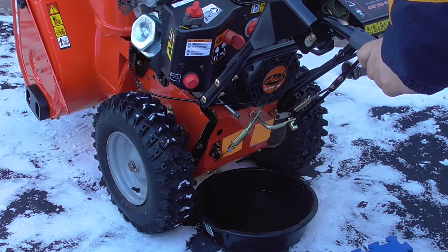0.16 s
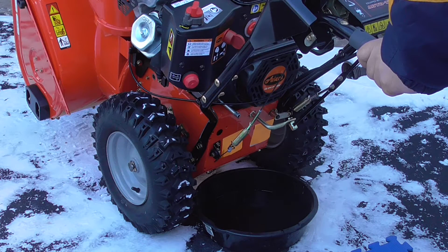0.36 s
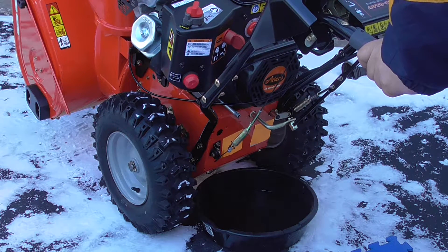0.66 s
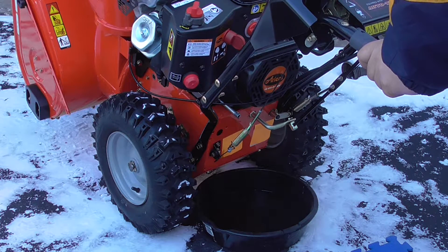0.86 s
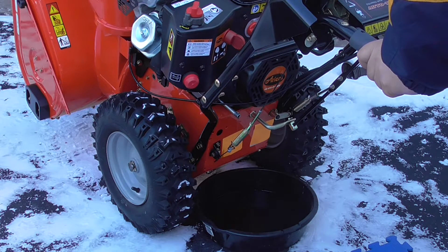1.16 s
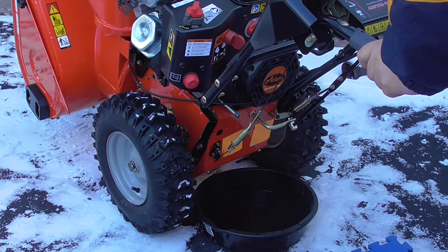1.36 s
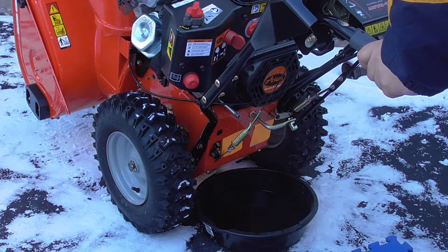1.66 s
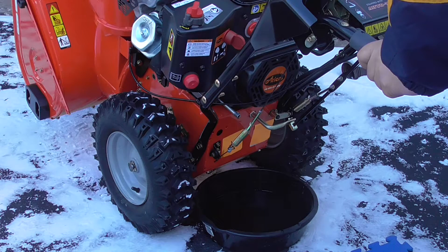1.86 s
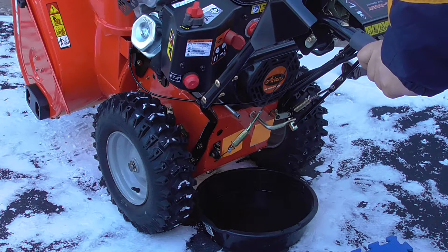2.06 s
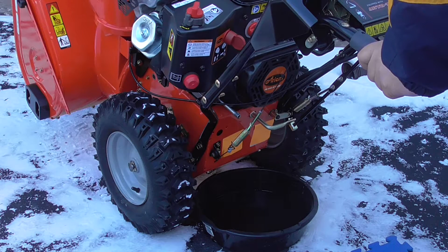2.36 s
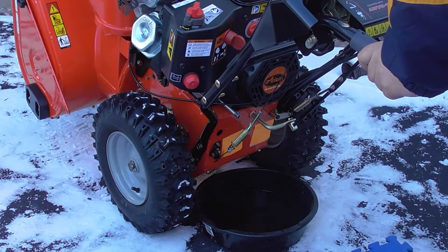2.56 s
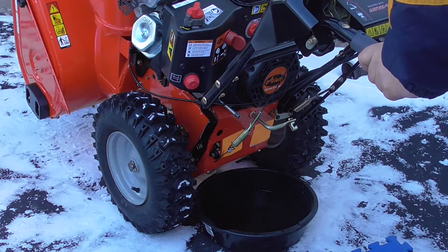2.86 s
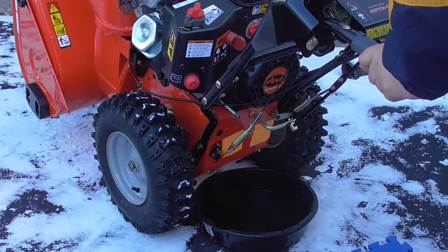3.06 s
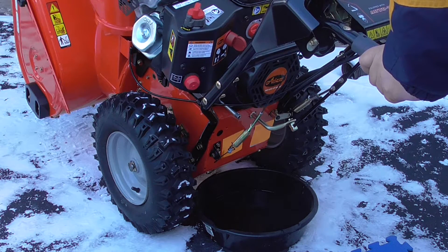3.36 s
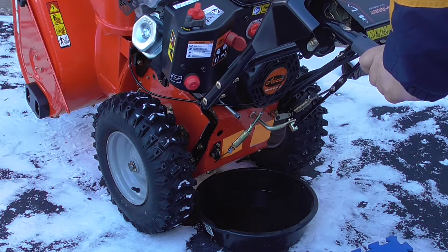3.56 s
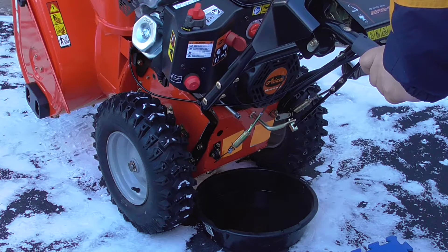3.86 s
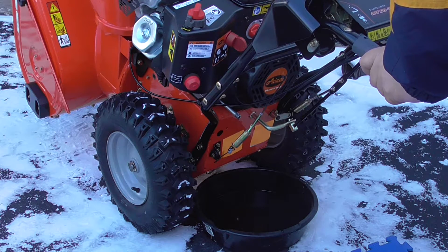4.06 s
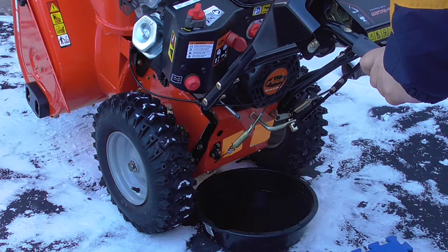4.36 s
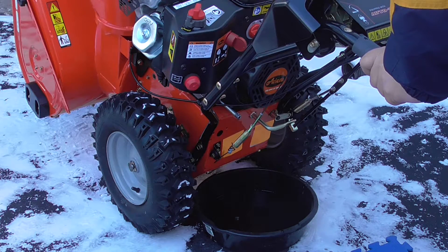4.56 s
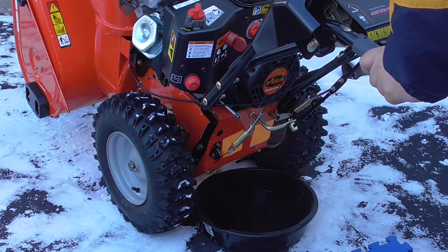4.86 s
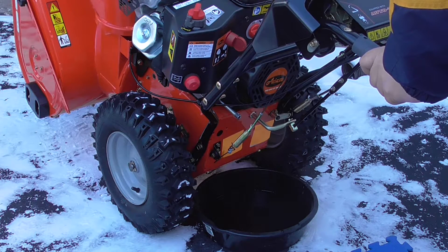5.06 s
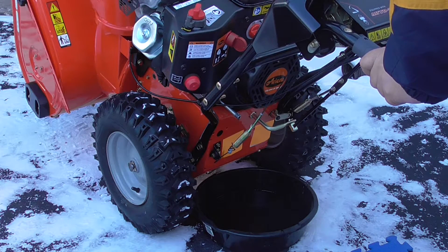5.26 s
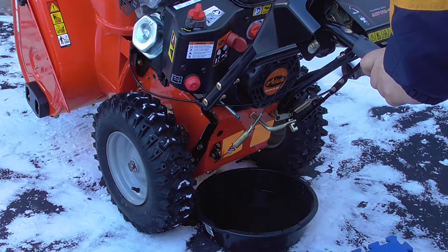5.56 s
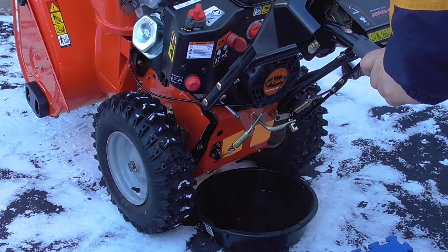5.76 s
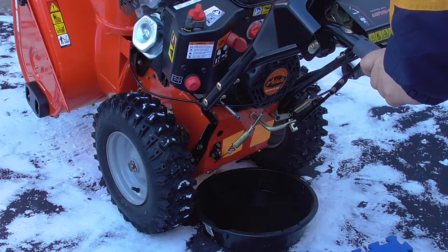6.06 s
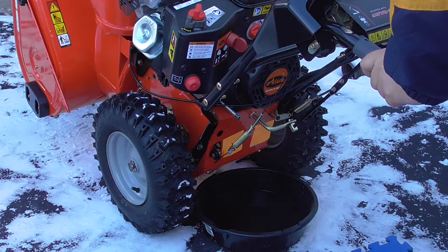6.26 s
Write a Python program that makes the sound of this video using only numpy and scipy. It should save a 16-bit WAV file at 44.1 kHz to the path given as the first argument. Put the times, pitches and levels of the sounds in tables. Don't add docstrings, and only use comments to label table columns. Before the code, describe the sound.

Eight dull, hollow knocks ring out one by one across a quiet snowy yard, each with short echoes, over faint traffic hum and wind buffeting.

```python
import sys
import numpy as np
from scipy import signal
from scipy.fft import rfft, irfft, next_fast_len
from scipy.io import wavfile
from scipy.ndimage import uniform_filter1d

SR = 44100
rng = np.random.default_rng(int(sys.argv[2]) if len(sys.argv) > 2 else 0)


def dump_mix(stems):
    frames = np.atleast_2d(stems).T
    limited = np.clip(frames, -1, 1)
    pcm = np.round(limited * 32767).astype(np.int16)
    wavfile.write(sys.argv[1], SR, pcm)


def linear_from_db(decibels):
    return 10 ** (np.asarray(decibels, float) / 20)


N = 282901
LONG = next_fast_len(N)
COARSE = 10

# pitch_hz, level_db (per Hz)
TRAFFIC_SPECTRUM = [(18, -47), (30, -31), (54, -6.5), (135, -6), (165, -1.5), (230, -2.5), (331, -8),
                    (377, -6.5), (496, -11), (876, -14.5), (1690, -28.5), (2300, -55), (2600, -120)]
# time_s, level_db, extra_bass_db
TRAFFIC_SWELL = [(0.0, -57, 4), (1.1, -58, 1), (2.4, -58, -2), (3.1, -58, 1), (4.6, -60, -2),
                 (5.6, -59.5, 2.5), (6.41, -59.5, 1)]
# pitch_hz, likeness (0-1)
PORT_LIKENESS = [(50, 0.88), (130, 0.94), (250, 0.91), (640, 0.54), (1400, 0.15), (3000, 0.049)]

# start_s, level_db, hold_s, left_share (0-1), eddy_hz
GUSTS = [(0, -42, .015, .15, 75), (0.034, -34.5, 0.027, 0.4, 178), (0.076, -30, 0.024, 0.07, 110),
         (0.133, -36, 0.027, 0.3, 150), (.186, -22.5, 0.044, 0.38, 155), (0.247, -34.5, 0.034, .05, 110),
         (.298, -31, 0.027, 0.07, 160), (0.395, -35.5, .015, 0.85, 101), (0.463, -46, 0.02, 0.4, 90),
         (1.08, -51, .07, .5, 100), (1.162, -32, 0.028, .27, 131), (1.23, -48, .12, 0.5, 92),
         (1.98, -47.5, 0.018, .98, 71), (3.18, -51, 0.074, .98, 99), (3.373, -44.5, .055, .9, 109),
         (3.495, -47, 0.027, 0.8, 93), (4.429, -47, .12, 0.34, 88), (4.637, -41.5, .022, .02, 87),
         (4.826, -35.5, 0.024, 0.17, 141), (5.337, -44, .025, 0.9, 84.6), (5.62, -46, .13, .35, 79.6),
         (6.055, -46.5, .08, .87, 136), (6.238, -44, .11, 0.9, 104), (6.394, -28, .03, .02, 112)]
GUST_RISE_DB_PER_S, GUST_FALL_DB_PER_S = 898, 600
CALM_DB, CALM_EDDY_HZ = -64.5, 75

# pitch_hz, level_db (per Hz)
HISS_SPECTRUM = [(1060, -43), (1800, -11.5), (2040, 3), (2280, -3), (2680, -5), (3480, -3.5), (3840, -3),
                 (4090, -2), (5920, -6), (7970, -4), (8720, -3.5), (12700, -4.5), (15500, -8)]
HISS_DB, HISS_SAG_DB_PER_S = -69, 0.22
# pitch_hz, width_hz, level_db
CIRCUIT_HUMP = (13060, 200, -83)
# pitch_hz, width_hz, level_db
FRAME_BUZZ = [(7640, 90, -98), (7950, 90, -91), (9150, 90, -99), (10760, 150, -94), (11780, 90, -99),
              (12460, 170, -91), (12760, 170, -89), (13050, 200, -92), (13550, 280, -95)]
FRAME_HZ = 59.942

# start_s, peak_db, pitch_hz
DROPS = [
    (.6235, -63, 3150),
]

# start_s, peak_db, crack_db (brightness above the usual for a blow)
KNOCKS = [
    (0.8513, -22, 0.5),
    (2.5034, -19.5, 0.5),
    (2.9296, -23.5, -4),
    (3.2243, -22.5, -2.5),
    (3.5665, -26.5, -24),
    (4.0502, -21.5, -1),
    (4.328, -30.5, -18),
    (5.4364, -23, -1.5),
]
# pitch_hz, strength (signed), t60_s
BODY_MODES = [(238, .24, .04), (612, -1.095, .009), (953, .198, .04), (1050, -.07, .035), (1437, .04, .035)]
CONTACT_HZ = 2080
# pitch_hz, level_db, t60_s
SLAP_MODES = [(1700, 9.5, 0.0059), (2014, -2, 0.03), (2290, 5, 0.022), (2534, 6.5, 0.011), (2800, -9, .025)]
# pitch_hz, level_db, t60_s
RIM_MODES = [(1265, -23.5, 0.039), (1350, -26.5, 0.013), (1473, -28.5, 0.12)]
# pitch_hz, level_db, t60_s
BOOM_MODES = [(157, 0.5, 0.28), (171, -4, 0.23), (224, 0.5, 0.18), (290.5, -6, 0.29), (408.8, -8, 0.83)]
# delay_ms, gain (signed), left_minus_right_gain (signed)
ECHO_PATHS = [(0.0, 0.69, 0.05), (1.13, 0.23, 0.02), (3.13, -0.34, 0.01), (5.56, 0.29, -0.02),
              (7.07, 1.11, 0.04), (11.2, -0.5, 0.0), (12.79, -0.34, 0.06), (15.8, 0.18, -0.03),
              (17.41, 0.19, 0.02), (18.71, -0.19, 0.02), (22.29, -0.18, -0.06), (23.7, -0.25, -0.07),
              (36.1, -0.24, -0.01), (37.64, -0.19, 0.02), (42.13, -0.26, -0.05), (44.51, 0.23, 0.0),
              (53.61, 0.21, 0.01), (59.95, -0.19, -0.03), (51.97, 0.14, -0.01), (56.21, 0.14, 0.01),
              (65.06, -0.13, -0.02), (86.35, -0.11, -0.02), (101.34, -0.11, 0.01), (83.4, -0.11, -0.01),
              (89.05, -0.1, 0.0), (91.68, -0.09, -0.03), (107.62, 0.06, 0.01), (146.24, 0.07, 0.0)]
# arrival_ms, level_db, dying_db_per_ms
FAR_WALLS = [(20, -25, .3), (46.3, -30, .3), (62, -33, 1.2), (84.3, -28.5, .3), (114, -30, .45),
             (145.6, -29, .9), (168, -41, .11)]
WALL_RISE_DB_PER_MS = 2.5


def rms_one(x):
    return x / np.sqrt(np.mean(x ** 2) + 1e-20)


def in_time(rows):
    s, *columns = np.transpose(rows)
    return [np.interp(np.arange(N) / SR, s, column) for column in columns]


def at_hz(points, hz):
    table_hz, value = np.array(points).T
    return np.interp(np.log(hz), np.log(table_hz), value)


def butter(x, hz, kind, order=2, step=1):
    return signal.sosfilt(signal.butter(order, hz, kind, fs=SR / step, output="sos"), x)


def resonance(x, hz, width):
    r = np.exp(-np.pi * width / SR)
    poles = [1, -2 * r * np.cos(2 * np.pi * hz / SR), r * r]
    return signal.lfilter([(1 - r * r) / 2, 0, (r * r - 1) / 2], poles, x)


def coloured(spectrum, channels):
    hz = np.maximum(np.fft.rfftfreq(LONG, 1 / SR), 1)
    white = rfft(rng.standard_normal((channels, N)), LONG)
    return white * linear_from_db(at_hz(spectrum, hz)), hz


def coarse_noise(hz, kind):
    white = rng.standard_normal(N // COARSE + 2001)
    return rms_one(butter(white, hz, kind, step=COARSE)[2000:])


def modes(table, t):
    return sum(linear_from_db(db - 60 * t / t60) * np.sin(2 * np.pi * hz * t) for hz, db, t60 in table)


def traffic():
    (mid, side), hz = coloured(TRAFFIC_SPECTRUM, channels=2)
    alike = np.clip(at_hz(PORT_LIKENESS, hz), 0, 1)
    pair = np.sqrt(1 + alike) * mid + np.sqrt(1 - alike) * side * [[1], [-1]]
    deep = 1 / (1 + (hz / 170) ** 4)
    level_db, bass_db = in_time(TRAFFIC_SWELL)
    upper_hum = irfft(pair * (1 - deep), LONG)[:, :N]
    deep_hum = irfft(pair * deep, LONG)[:, :N]
    return rms_one(upper_hum + linear_from_db(bass_db) * deep_hum) * linear_from_db(level_db + 8.5)


def gusts():
    t = np.arange(0, N, COARSE) / SR
    s, db, hold, left, hz = np.transpose(GUSTS)[:, :, None]
    rise_db = GUST_RISE_DB_PER_S * np.maximum(s - t, 0)
    fall_db = GUST_FALL_DB_PER_S * np.maximum(t - s - hold, 0)
    power = linear_from_db(db - rise_db - fall_db) ** 2
    calm = linear_from_db(CALM_DB) ** 2
    total = power.sum(axis=0) + calm
    left_share = ((power * left).sum(axis=0) + 0.5 * calm) / total
    eddy_hz = ((power * hz).sum(axis=0) + CALM_EDDY_HZ * calm) / total
    return 10 * np.log10(total), left_share, eddy_hz


def wind(lump_db, fall_db, skirt_db, top, widen):
    level_db, left, eddy_hz = gusts()
    ports = []
    for share in (left, 1 - left):
        flutter, power = 0, 0
        for hz in 42 * 2 ** np.arange(0, 4.5, 1 / 3):
            octaves = np.log2(hz / eddy_hz)
            weight = linear_from_db(np.maximum(-fall_db * octaves ** 2, skirt_db - 8.4 * np.abs(octaves)))
            eddies = coarse_noise([hz / 1.111, hz * 1.125], "band")
            eddies = eddies * linear_from_db(lump_db * coarse_noise(13.6, "low"))
            flutter, power = flutter + weight * eddies, power + weight ** 2
        flutter = flutter / np.sqrt(power)
        flutter = flutter / (uniform_filter1d(flutter ** 2, size=130) + 0.045) ** 0.29
        port = flutter * np.sqrt(np.clip(share, 0, 1)) * linear_from_db(level_db + 4.1)
        port = signal.resample_poly(port, COARSE, 1)[:N]
        ports.append(top * np.tanh(port / top))
    pair = np.array([ports[0] - widen * ports[1], ports[1] - widen * ports[0]])
    falloff = np.clip((N - np.arange(N)) / 400, 0, 1)
    return falloff * butter(pair, 42, "high")


def camera():
    mid, side = irfft(coloured(HISS_SPECTRUM, channels=2)[0], LONG)[:, :N]
    hiss_db = HISS_DB - HISS_SAG_DB_PER_S * np.arange(N) / SR + 3.0
    hiss = rms_one(np.array([mid + 0.86 * side, mid - 0.9 * side])) * linear_from_db(hiss_db)
    hz, width, db = CIRCUIT_HUMP
    hump = rms_one(resonance(rng.standard_normal((2, N)), hz, width))
    hump = hump * linear_from_db(db) * linear_from_db(np.array([[-3.0], [3.0]]))
    pulses = np.diff(np.floor(np.arange(N + 1) * FRAME_HZ / SR))
    buzz = 0
    for hz, width, db in FRAME_BUZZ:
        ringing = resonance(resonance(pulses, hz, width), hz, width)
        buzz = buzz + linear_from_db(db) * rms_one(ringing)
    return hiss + hump + buzz


def drops():
    out, t = np.zeros(N), np.arange(800) / SR
    for s, db, hz in DROPS:
        noise = rng.standard_normal(len(t))
        splash = butter(noise, [1100, 5500], "band") * linear_from_db(-60 * t / 0.04)
        ring = np.sin(2 * np.pi * hz * t) * linear_from_db(-60 * t / 0.05)
        out[round(s * SR):][:len(t)] = linear_from_db(db) * (3.0 * splash + 1.3 * ring)
    return out


def body_thump():
    t = np.arange(600) / SR
    thump = sum(g * np.sin(2 * np.pi * hz * t) * linear_from_db(-60 * t / t60) for hz, g, t60 in BODY_MODES)
    r = np.exp(-2 * np.pi * CONTACT_HZ / SR)
    thump = signal.lfilter([1], [1, -2 * r, r * r], thump)
    return thump / np.max(np.abs(thump))


def far_walls(ms):
    power = 0
    for at, db, falloff in FAR_WALLS:
        loss_db = np.maximum(WALL_RISE_DB_PER_MS * (at - ms), falloff * (ms - at))
        power = power + linear_from_db(db - loss_db) ** 2
    return np.sqrt(power)


def yard_echoes(ms, scatter_hz):
    scatter = rng.standard_normal((2, len(ms))) * [[1], [0.36]] * far_walls(ms) * linear_from_db(-11.0)
    paths = resonance(scatter, scatter_hz, 440) * (ms > 4)
    for delay_ms, mid, side in ECHO_PATHS:
        paths[:, round(delay_ms * SR / 1000)] += mid, 1.9 * side
    return paths


def knocks(slap_db, crack_db, boom_db, scatter_hz):
    ms = np.arange(SR // 2) / SR * 1000
    paths = yard_echoes(ms, scatter_hz)
    boom = modes(BOOM_MODES, ms / 1000) * (1 - linear_from_db(-ms / 0.99)) ** 2
    fade = np.arange(3000) / SR
    slap = modes(SLAP_MODES, fade) * np.clip(fade / 0.0012, 0, 1)
    rim = modes(RIM_MODES, fade)
    blows, slaps, cracks = np.zeros(N), np.zeros(N), np.zeros((2, N))
    for s, db, bright_db in KNOCKS:
        at = round(s * SR)
        blows[at] = linear_from_db(db)
        slaps[at:at + 3000] = linear_from_db(db) * (linear_from_db(0.3 * bright_db) * rim + linear_from_db(slap_db + bright_db) * slap)
        grit = rng.standard_normal((3, 3000))
        spray = (grit[0] + 0.98 * grit[1:]) * (1 - linear_from_db(-fade / 0.00015)) * linear_from_db(-60 * fade / 0.13)
        crack = butter(spray, [2700, 8200], "band")
        cracks[:, at:at + 3000] = linear_from_db(db + crack_db + 1.2 * bright_db) * crack
    thumps = np.convolve(blows, body_thump())
    thump_echoes = signal.fftconvolve(thumps[None], paths, axes=1)[:, :N]
    soaked_paths = paths * [[1], [1.6]] * linear_from_db(-ms / 5)
    slap_echoes = signal.fftconvolve(slaps[None], soaked_paths, axes=1)[:, :N]
    mid, side = thump_echoes + slap_echoes
    mid = mid + linear_from_db(boom_db) * signal.fftconvolve(blows, boom)[:N]
    return np.array([mid + side, mid - side]) + cracks


def scene():
    air = traffic() + wind(lump_db=1.5, fall_db=8, skirt_db=-7, top=0.16, widen=0.5)
    return air + drops() + knocks(slap_db=-27.0, crack_db=-33.5, boom_db=-15.5, scatter_hz=570)


def band_limit(x):
    return signal.sosfilt(signal.butter(12, 15670, fs=SR, output="sos"), x)


def record(dry):
    return band_limit(dry + camera())


dry = scene()
out = record(dry)
dump_mix(out)
```